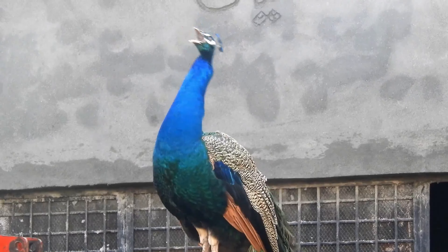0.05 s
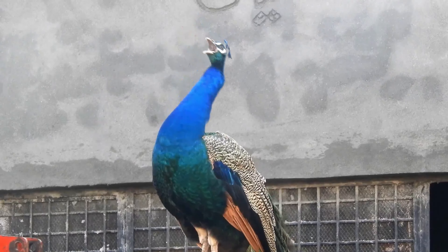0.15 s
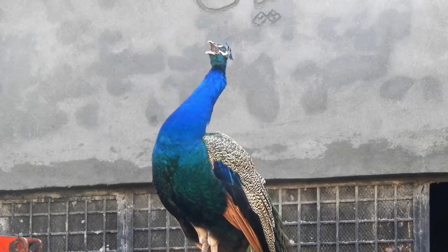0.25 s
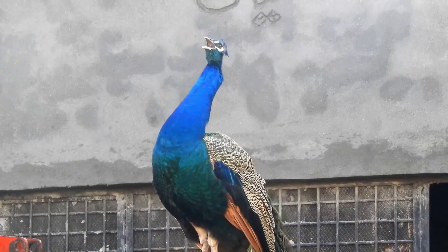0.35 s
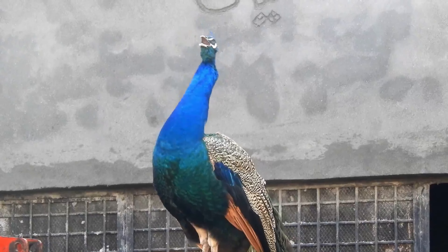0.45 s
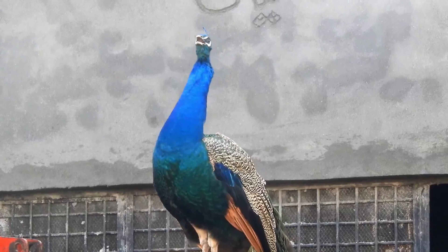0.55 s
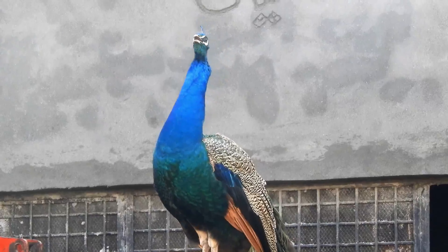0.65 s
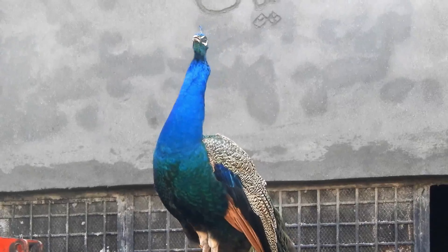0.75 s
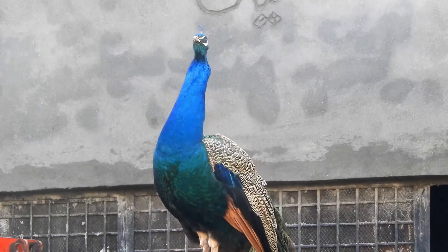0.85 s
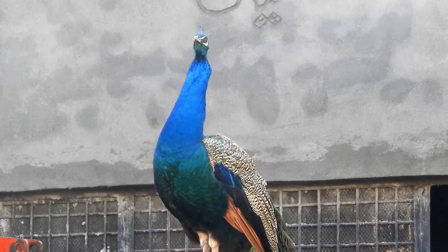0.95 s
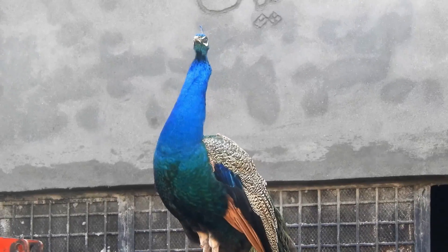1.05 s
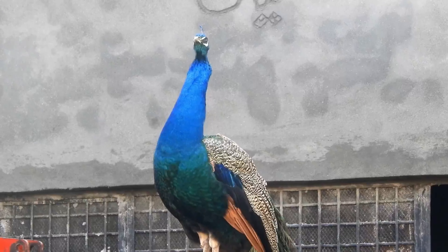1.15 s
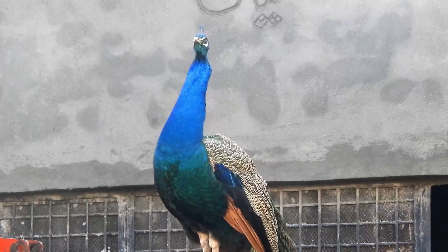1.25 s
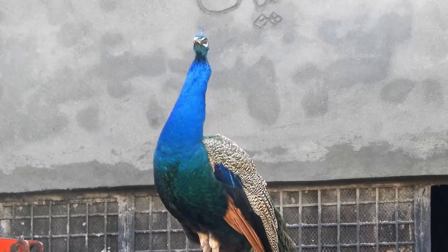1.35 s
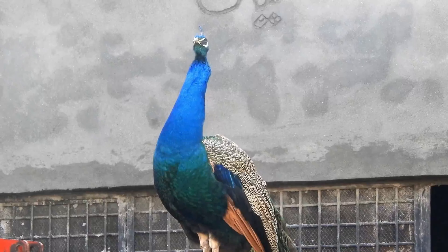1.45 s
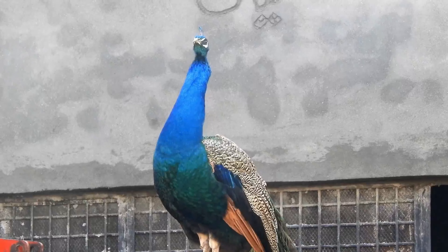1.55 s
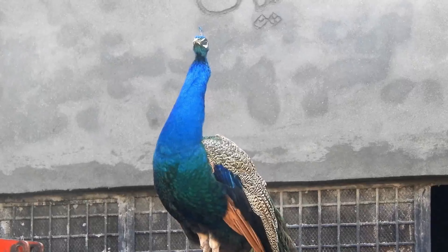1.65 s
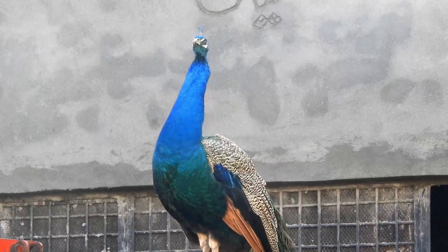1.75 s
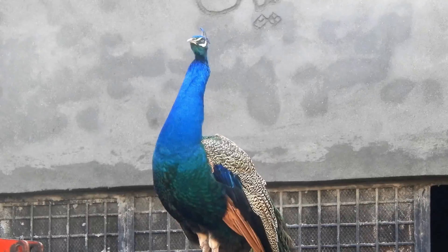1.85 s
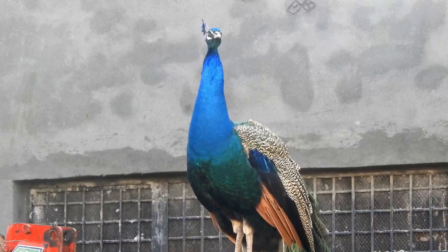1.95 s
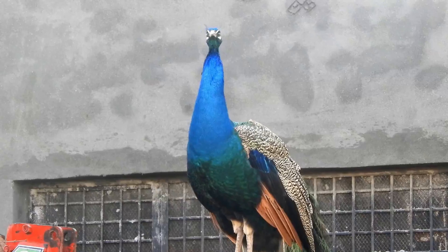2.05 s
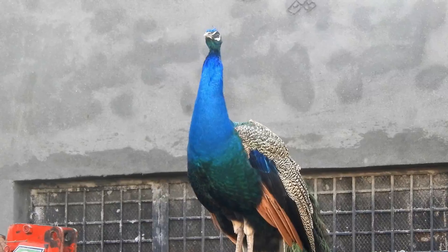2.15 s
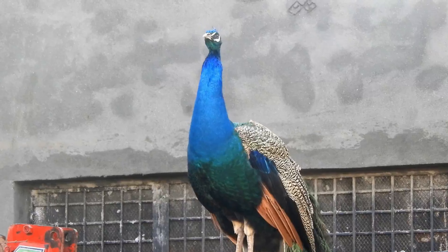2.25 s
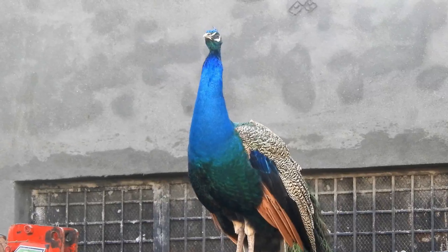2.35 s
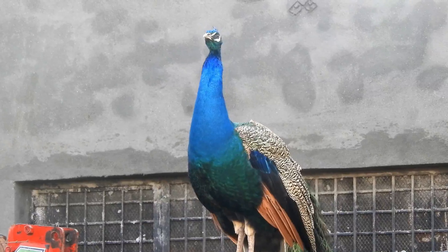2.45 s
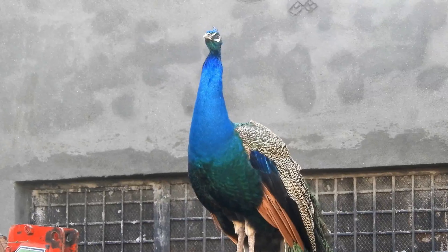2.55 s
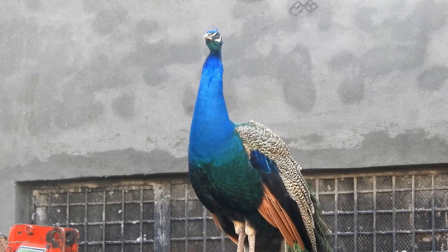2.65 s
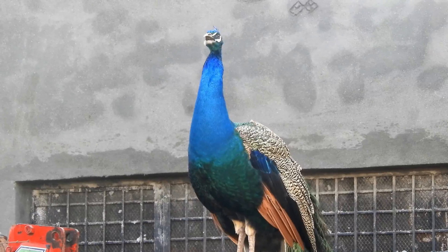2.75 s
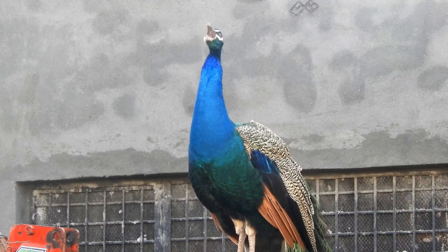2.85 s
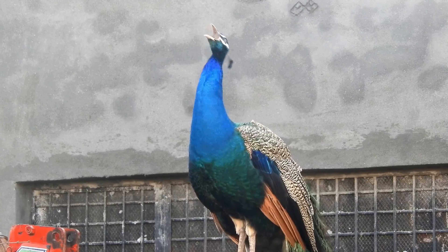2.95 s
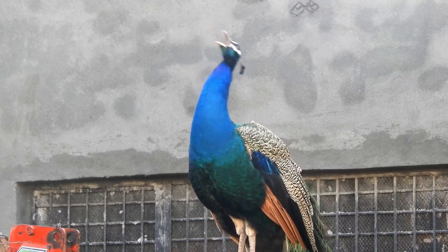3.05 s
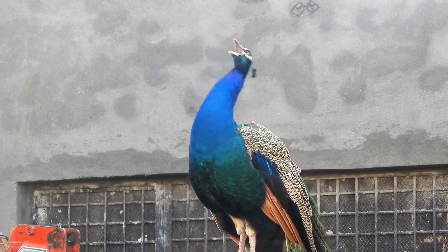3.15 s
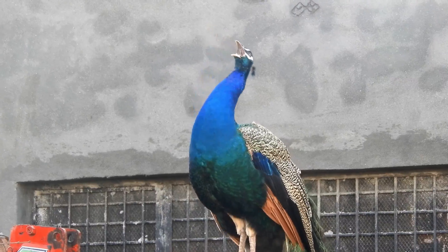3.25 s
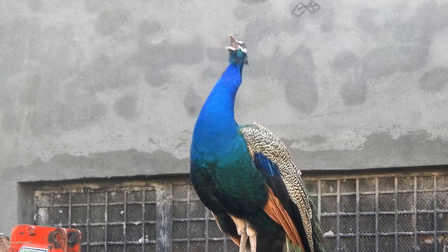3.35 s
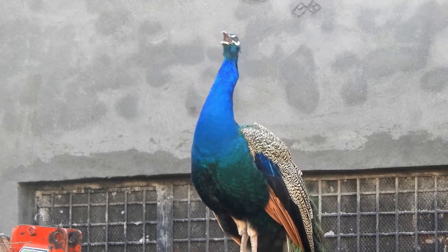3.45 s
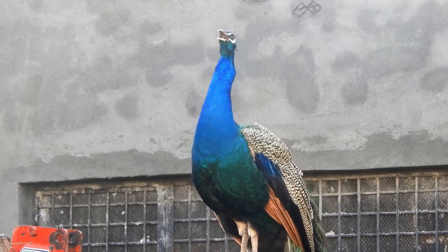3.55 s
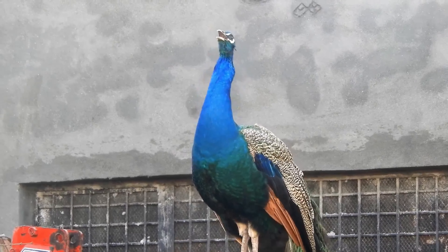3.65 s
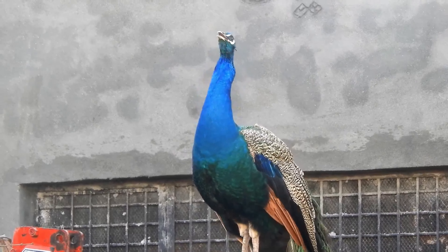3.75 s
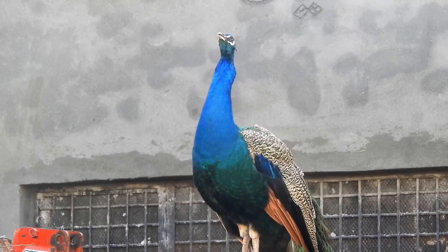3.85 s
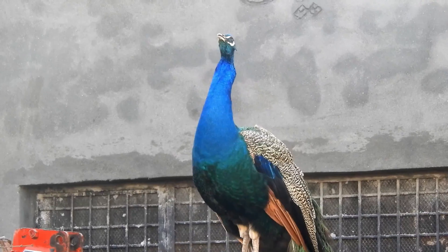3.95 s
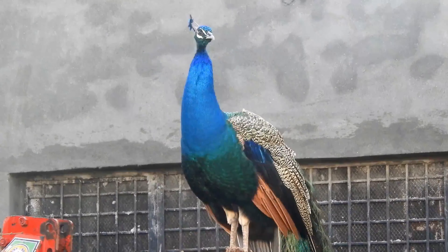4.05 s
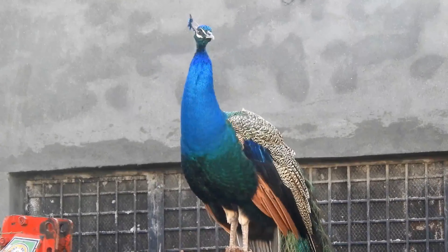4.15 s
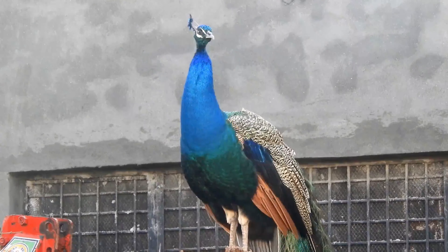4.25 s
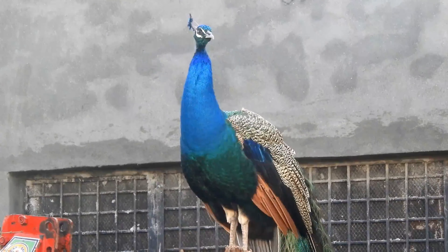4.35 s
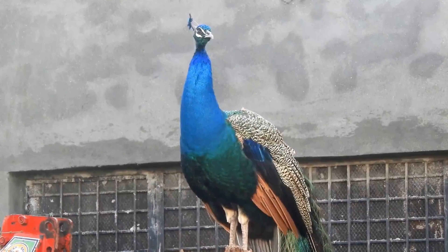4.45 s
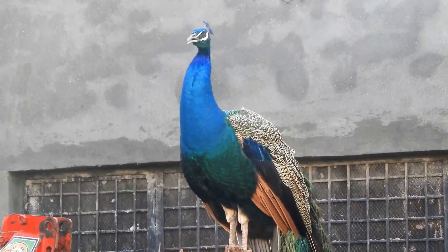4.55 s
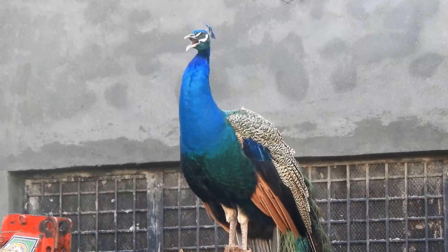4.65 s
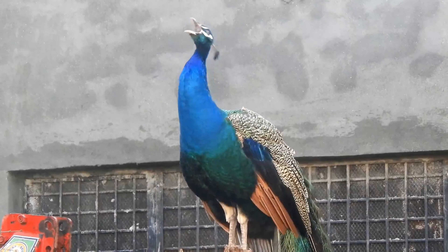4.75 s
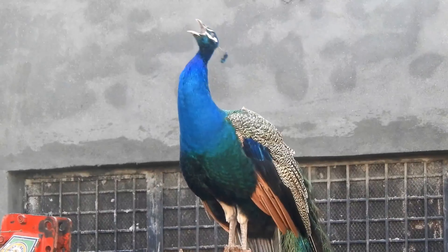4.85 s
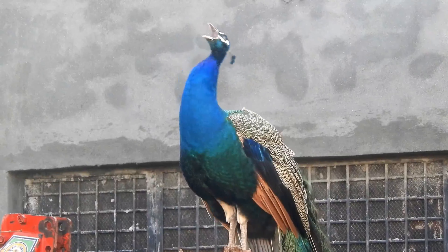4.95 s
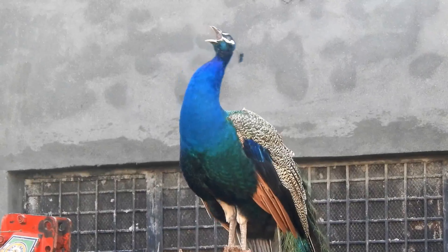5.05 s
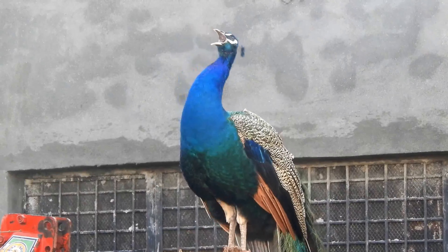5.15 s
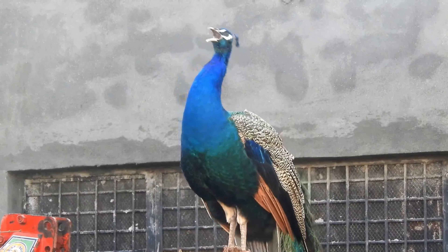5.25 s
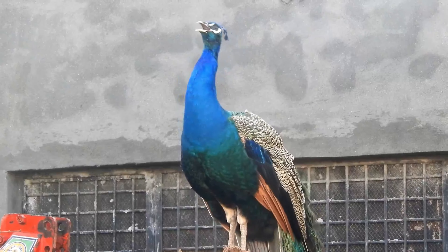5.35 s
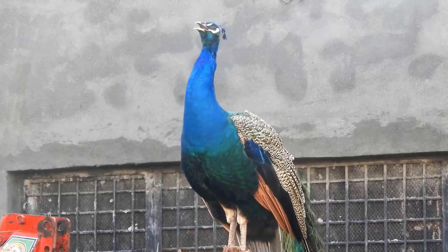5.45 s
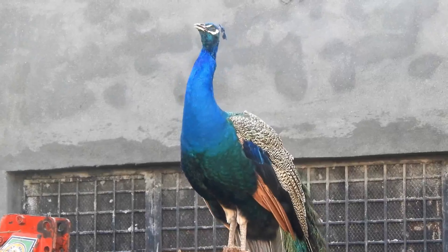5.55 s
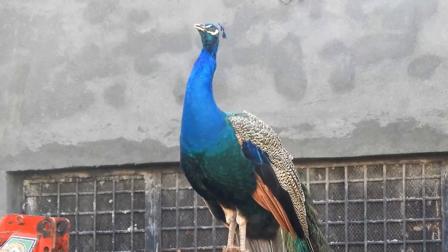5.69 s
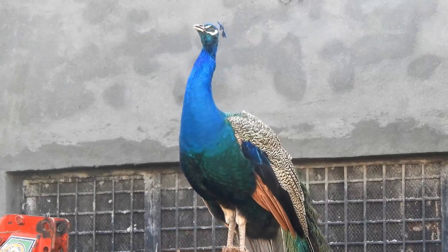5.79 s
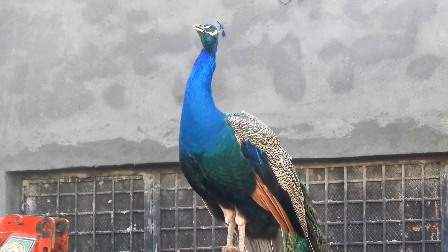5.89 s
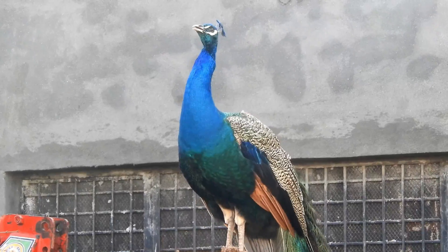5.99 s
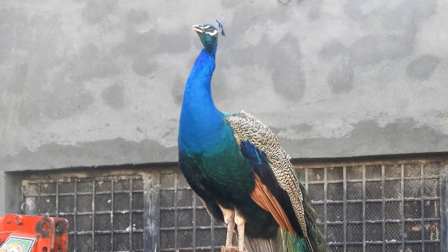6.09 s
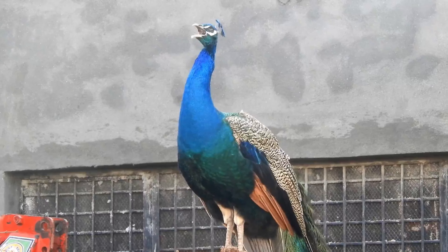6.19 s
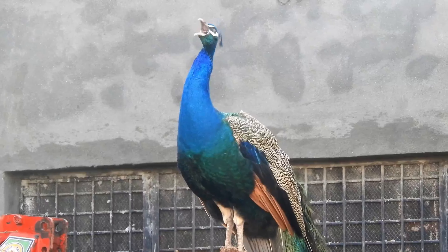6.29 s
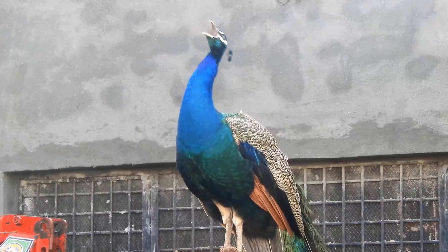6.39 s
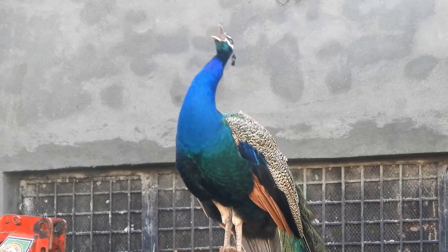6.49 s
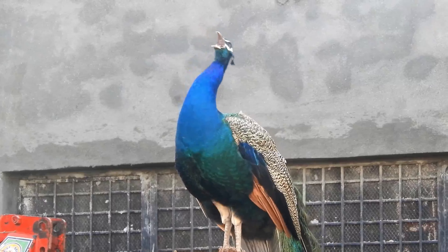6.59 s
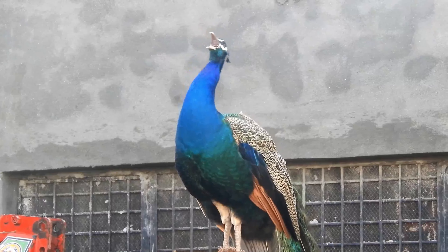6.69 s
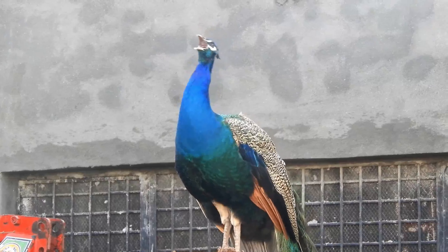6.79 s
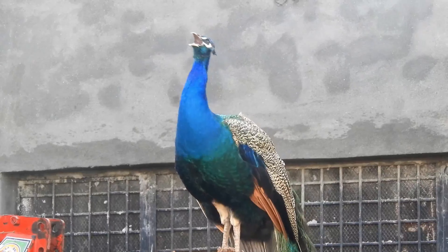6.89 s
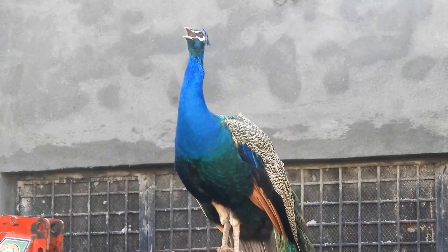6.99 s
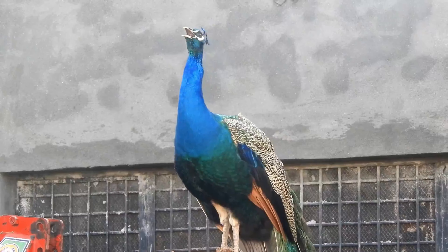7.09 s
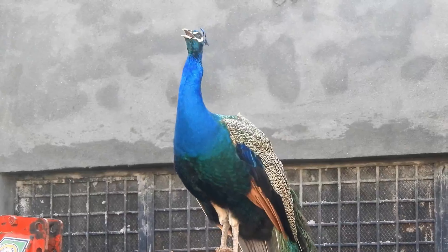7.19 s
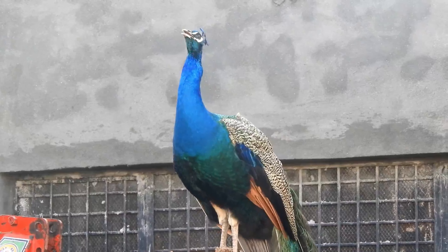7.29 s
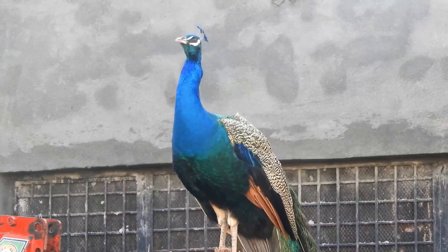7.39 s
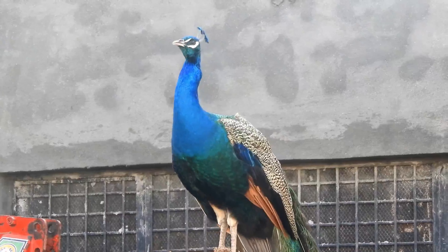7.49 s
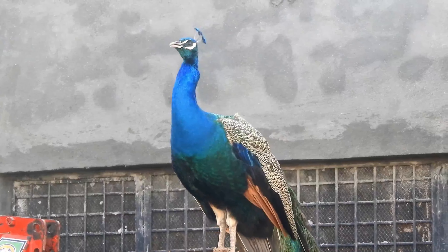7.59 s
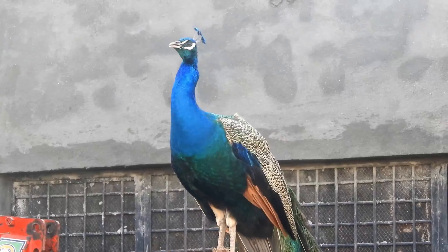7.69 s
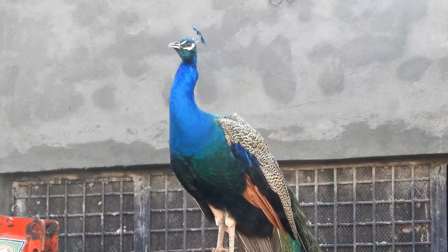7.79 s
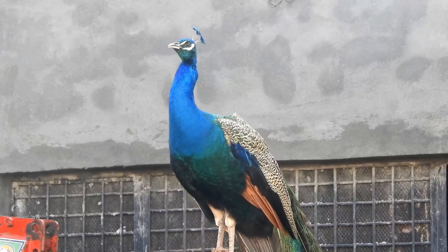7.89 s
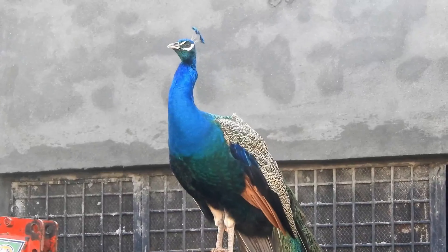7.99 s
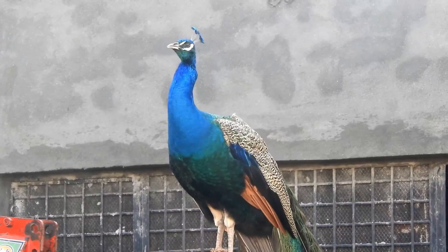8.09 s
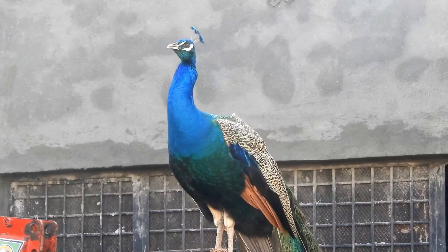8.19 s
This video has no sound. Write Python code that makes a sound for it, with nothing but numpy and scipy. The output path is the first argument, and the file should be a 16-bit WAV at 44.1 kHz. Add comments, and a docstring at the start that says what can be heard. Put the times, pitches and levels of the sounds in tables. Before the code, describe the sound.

A light breeze runs throughout as low rumble, midrange wash and thin leafy hiss, rising and falling gently. At 0 s a nearby peacock gives a coarse, low, nearly level honk of about a third of a second, with a soft thump beside it. From 0.4 to 2.8 s small birds farther off drop short falling whistles, pips and hoarse chatter; faint low bumps touch the microphone around 1.2 and 2.1 to 2.4 s. At 2.9 s comes a loud, brassy cry of about 0.65 s, gliding up, turning purer, then falling. A quick trill and brighter chirps follow around 3.6 to 4.4 s. A second, stronger cry sounds at 4.8 s, and a third at 6.3 s climbs highest before dropping. Nearby walls return short echoes, and the background dips after the loudest peaks. A faint bump at 7.5 s, a dull distant knock at 7.8 s and final pips around 8 s close.

```python
"""A breeze rumbles, washes and hisses throughout (wavering filtered noise); whistles and chatter (bent tones) are scattered over it.
A peacock honks low at the start beside a soft bump (decaying low noise); most other bumps fall before its second call.
Three arching cries follow, near 2.9, 4.8 and 6.3 s: harmonics in four registers plus turbulence, echoed by walls (noise tails).
Something knocks at 7.8 s (decaying noise). Gain control cuts the loudest peaks and recovers slowly, so the background dips."""
import sys
import numpy as np
from scipy import signal
from scipy.fft import rfft, irfft, next_fast_len
from scipy.io import wavfile
from scipy.ndimage import uniform_filter1d, minimum_filter1d, map_coordinates

SR = 44100
rng = np.random.default_rng(int(sys.argv[2]) if len(sys.argv) > 2 else 0)


def wav_out(sig):
    """Save sig, one row per channel (or a flat mono array), as 16-bit PCM at SR to the path in sys.argv[1]."""
    wavfile.write(sys.argv[1], SR, np.round(np.clip(np.atleast_2d(sig).T, -1, 1) * 32767).astype(np.int16))


N = 362943

# breeze: (time [s], rumble [dB], yard wash before trim [dB], leaf hiss before trim [dB])
BREEZE = [(.5, -47.5, -54.5, -54), (1.15, -45, -56, -52.5), (1.9, -48.5, -56.5, -57.5),
          (2.25, -47, -48.5, -51.5), (2.85, -47, -48.5, -53.5), (3.699, -50.5, -58.5, -56.5),
          (4.3, -42.5, -52.5, -54), (5.5, -52, -60, -59.5), (6.9, -44.5, -56.5, -56),
          (7.701, -52.5, -63.5, -66), (8.23, -44, -61, -62.5)]
# noise spectra of the rumble, yard wash and leaf hiss: (frequency [Hz], relative level [dB])
RUMBLE_SPECTRUM = [(20, 2.5), (35, -5.5), (70, -2), (150, 0), (210, -5), (300, -25.5), (450, -37.5),
                   (800, -93)]
YARD_SPECTRUM = [(120, -17), (280, 1), (500, -3), (1100, -5), (1800, -9), (3000, -13), (6000, -40.5)]
HISS_SPECTRUM = [(900, -24), (2000, -3), (3000, -5.5), (4500, 0.5), (6500, -6), (8500, -10), (10000, -19),
                 (14000, -22.5), (16000, -32)]
# noise spectrum of the knock: (frequency [Hz], relative level [dB])
KNOCK_SPECTRUM = [(60, -29), (110, 6), (350, 2.5), (550, -14), (900, -12), (1700, -18), (4500, -24.5),
                  (8700, -35), (12000, -56)]
# soft bumps: (time [s], level [dB], centre [Hz], t60 [s])
BUMPS = [(0.066, -16, 115, 0.071), (1.172, -35.5, 32.3, 0.41), (2.07, -35, 130, 0.11),
         (2.307, -24, 105, 0.2), (2.342, -33, 125, 0.16), (2.394, -24, 142.5, 0.12),
         (7.506, -35.5, 109.7, 0.2)]

# Small-bird notes, all: (time [s], length [s], mid-note pitch [Hz], sweep [Hz], level before trim [dB])
# drop and level out
DOWNSLURS = [(.40, 0.053, 2737, -1000, -38.5), (.72, 0.07, 2585, -590, -46.5),
             (.93, 0.042, 2710, -470, -38.5), (1.055, 0.057, 2774, -430, -41),
             (1.21, 0.078, 2800, -460, -45.5), (2.054, 0.062, 2876, -220, -41),
             (2.70, 0.084, 1850, -450, -46.5), (3.53, .12, 2394, -200, -36), (3.63, 0.33, 3870, -670, -47),
             (3.904, .12, 2520, -1000, -31.5), (3.915, 0.056, 3220, -830, -33),
             (4.23, 0.11, 2082, -400, -44.5), (4.405, .035, 3050, -1000, -35.5)]
# climb steadily
UPSLURS = [(.52, .11, 2990, 1300, -43), (1.40, 0.078, 2394, 860, -44.5), (1.79, 0.14, 2690, 1001, -44),
           (2.71, .12, 3980, 1056, -47.5), (5.68, .035, 4570, 700, -50.5), (5.84, 0.048, 4150, 905, -46),
           (7.94, 0.064, 2562, 650, -49.5)]
# short, mostly lifting onto a held pitch
PIPS = [(1.495, .035, 2996, 303, -38), (1.552, .042, 3177, 100, -39), (1.62, .055, 3157, 30, -41.5),
        (2.42, 0.11, 2450, 71, -46.5), (4.104, 0.066, 3090, 168, -34), (4.44, 0.076, 2753, 0.5, -46),
        (8.007, .038, 3000, 208, -42.5), (8.069, .038, 3220, -1, -43.5), (8.122, 0.045, 3212, 2, -40.5)]
# thin, high, falling ever faster
SWOOPS = [(5.44, .20, 5370, -1350, -46.5), (5.71, 0.072, 4710, -900, -43.5),
          (6.188, .1, 5900, -2250, -47.5)]
# hoarse
CHATTER = [(1.19, 0.16, 5280, -950, -50), (1.50, 0.11, 4700, -1000, -55), (1.95, 0.095, 3110, -6.5, -48.5),
           (2.24, .13, 6160, 2.5, -55), (2.46, 0.14, 3200, 2.5, -48), (3.90, 0.084, 6140, -600, -53),
           (4.23, 0.16, 4660, -500, -56), (5.90, 0.055, 4800, -1700, -55), (7.66, .13, 5600, -1100, -58)]
# low, nearly level, far off
HOOTS = [(1.40, 0.71, 1600, -130, -55), (1.44, 0.45, 779, -8, -56), (1.90, .07, 351, 13.5, -42.5),
         (4.47, .27, 1707, -72.5, -46), (6.05, 0.1, 2193, -20, -55)]
# quick run of like notes: (time [s], level of the held part [dB])
TRILL = [(3.601, -43.5), (3.675, -45), (3.748, -46.5), (3.823, -45), (3.901, -43.5), (3.975, -42)]

# arch of each call, start to end: (time [s], pitch [Hz], push over held effort [dB], flare of the twelfth [dB])
ARCHES = [
    [(0, 522, 4.5, 4), (.064, 529.3, -1, -1.5), (.125, 546.2, -2.5, 2.5), (.2, 535.8, -4, 0),
     (.306, 529.3, -6, 2), (.341, 507, -3.5, 4.5)],
    [(2.877, 540.4, 2, 2.5), (2.9, 538.6, -4, -4.5), (2.98, 583.8, 2.5, 1), (3.05, 616.3, 1, -5),
     (3.15, 635.8, -1.5, 6), (3.25, 640.5, -2.5, 1), (3.28, 644.8, 2, 7.5), (3.385, 654.4, 1.5, -2),
     (3.44, 626.4, -1.5, 4), (3.525, 548, 6.5, -1)],
    [(4.768, 554, -8, 1), (4.797, 583.8, 3, 5.5), (4.845, 600.6, -3.5, -5), (4.88, 628.6, 2.5, 4),
     (5.0, 658, 0, -2), (5.11, 672.3, -3, 3), (5.215, 680.5, 2, 2), (5.3, 670.4, -3, -2), (5.34, 607, 3, 8)],
    [(6.295, 542.7, -1.5, 0), (6.365, 592, -3, 0.5), (6.415, 630.5, 4, 4.5), (6.47, 641.3, 1, -1.5),
     (6.55, 658.8, 2, 0.5), (6.655, 662.5, 1.5, 1), (6.825, 740.4, -0.5, -4.5), (6.895, 733, -4, 0),
     (6.955, 663.3, -1, -5.5), (7.016, 565.6, 0, 3.5)],
]
# effort of each call: (level [dB], brightness [dB], swell [s], release [s], beak narrows at [s],
# how far [0-1], rasp [dB], fundamental before trim [dB])
CRIES = [(-7.5, 2, 0.011, 0.026, 0.84, .1, -23, -2.5), (-6.5, 0, 0.032, 0.1, 3.293, .75, -25.5, 1),
         (-2, 1, 0.03, 0.032, 5.127, .9, -25.5, 0), (-5, 0, .085, 0.074, 6.71, 1, -26, -1.5)]
# octave, twelfth, blare (partials 4-5), edge (6 and up): (beak wide [dB], beak narrow [dB],
# lead on the beak [s], change time [s], lack at onset [dB], fall in release [dB])
REGISTERS = [(1.5, 7.5, 0.016, 0.014, 13, 26.5), (1.5, -14, -0.00043, 0.01, 17, 16),
             (1, -20.5, 0.0076, 0.059, 21, 21), (-10, -15.5, -0.11, 0.017, 17, 17.5)]
# throat colour in the low honk, beak wide, beak narrowing: (frequency [Hz], relative level [dB])
HONK_COLOUR = [(520, -21.5), (1050, -2), (2150, 0.5), (2700, -4.5), (3200, -19.5), (3750, -20),
               (4300, -12.5), (4800, -20.5), (5400, -29), (8300, -36.5), (9500, -61), (15000, -89.5)]
WIDE_COLOUR = [(600, -20), (1200, 2), (2400, -6), (3200, -12), (3650, -14), (4400, -8.5), (5100, -21),
               (7300, -24.5), (8500, -32), (9500, -43), (15000, -62)]
NARROW_COLOUR = [(680, -22.5), (1350, -8), (2700, -16), (3450, -17), (4100, -13), (4700, -11), (5300, -25),
                 (5950, -12.5), (7500, -29.5), (9500, -33), (11900, -40), (15000, -75)]
# turbulence low in the throat, and sizzle at the beak: (frequency [Hz], relative level [dB])
RASP_SPECTRUM = [(150, -26.5), (400, -17.5), (800, -7), (1300, -7), (2200, -6), (3300, -17), (4500, -16.5),
                 (7500, -27), (9800, -50), (15000, -63)]
SIZZLE_SPECTRUM = [(1500, -22), (3500, -5), (4600, -7), (7500, -7.5), (8700, -6), (9800, -20.5),
                   (15500, -32)]

# decay of the late tail: (frequency [Hz], t60 [s])
LATE_T60 = [(200, 0.55), (700, 0.74), (1430, 0.58), (2200, 0.79), (5000, 0.29), (9000, .45), (15000, .2)]
# treble lift of the reflections: (frequency [Hz], gain [dB])
TREBLE_LIFT = [(1400, 3), (2400, 4.5), (4500, 8), (9000, 10.5)]

STRAIN_S = .1  # a cry's added roughness peaks this long after its start
GAIN_KNEE_DB, GAIN_SHARE, RECOVERY_DB_PER_S = -2.5, 0.72, 7  # share: part of the excess taken off
TOP_HZ = 15800
PEAK_HOLD = SR // 100  # samples


def amp(db):
    """Decibels to gain."""
    return 10 ** (np.asarray(db) / 20)


def unit(x):
    """x at rms 1."""
    return x / np.sqrt(np.mean(x ** 2) + 1e-20)


def along(points, hz):
    """(Hz, value) points read on a log frequency axis."""
    f, v = np.transpose(points)
    return np.interp(np.log(hz + 1), np.log(f + 1), v)


def wobble(knots_per_s, size):
    """Smooth random curve."""
    knots = rng.standard_normal(int(size * knots_per_s / SR) + 4)
    return map_coordinates(knots, [np.arange(size) * knots_per_s / SR])


def filtered(x, response):
    """x times a response of frequency."""
    size = x.shape[-1]
    m = next_fast_len(size + 8192)
    return irfft(rfft(x, m) * response(np.fft.rfftfreq(m, 1 / SR)), m)[..., :size]


def noise(spectrum, size):
    """Coloured noise of rms 1."""
    white = rng.standard_normal(size)
    return unit(filtered(white, lambda hz: amp(along(spectrum, hz))))


def add(track, time_s, sound):
    """Lay a sound into a track."""
    start = max(0, round(time_s * SR))
    track[start:start + len(sound)] += sound[:max(0, N - start)]


def fade(t, edge_s):
    """Gate over the times t with smooth edges."""
    from_end_s = np.minimum(t - t[0], t[-1] - t)
    return np.sin(np.pi / 2 * np.clip(from_end_s / edge_s, 0, 1)) ** 2


def spread(spectrum, side_db, waver_db):
    """Wavering stereo noise, mostly common to both ears."""
    mid = noise(spectrum, N)
    side = amp(side_db) * noise(spectrum, N)
    return np.array([mid + side, mid - side]) * amp(waver_db * wobble(31, N))


def air():
    """Low rumble, midrange yard wash and leaf hiss: noise bands following the breeze."""
    time_s, *columns_db = np.transpose(BREEZE)
    rumble, yard, hiss = [amp(np.interp(np.arange(N) / SR, time_s, db)) for db in columns_db]
    return (rumble * spread(RUMBLE_SPECTRUM, side_db=-15.0, waver_db=2.4)
            + yard * amp(1.5) * spread(YARD_SPECTRUM, side_db=-8, waver_db=1.77)
            + hiss * amp(2.0) * spread(HISS_SPECTRUM, side_db=-6, waver_db=1.2))


def struck(t, level_db, t60_s, rise_s, spectrum):
    """Noise that rises fast and decays exponentially."""
    envelope = amp(level_db - 60 * t / t60_s) * (1 - np.exp(-t / rise_s))
    return envelope * noise(spectrum, len(t))


def bumps():
    """Soft pushes on the microphone: decaying noise around a low centre."""
    track, t = np.zeros(N), np.arange(SR // 2) / SR
    for time_s, level_db, centre_hz, t60_s in BUMPS:
        spectrum = [(centre_hz / 4, -14), (centre_hz, 0), (centre_hz * 1.3, -3),
                    (centre_hz * 3, -30), (centre_hz * 12, -80)]
        add(track, time_s, struck(t, level_db, t60_s, 0.0017, spectrum))
    return track


def knock(level_db=-35, t60_s=0.9):
    """Blunt knock some way off: broader decaying noise."""
    track, t = np.zeros(N), np.arange(SR // 2) / SR
    add(track, 7.789, struck(t, level_db, t60_s, 0.0016, KNOCK_SPECTRUM))
    return track


def whistle(length_s, start_hz, middle_hz, end_hz, hoarse_hz):
    """Tone of rms 1 bent through three pitches; fast pitch scatter makes it hoarse."""
    t = np.arange(round(length_s * SR)) / SR
    bend = np.polyfit([0, .5, 1], [start_hz, middle_hz, end_hz], 2)
    pitch_hz = np.polyval(bend, t / length_s)
    pitch_hz = pitch_hz + hoarse_hz * wobble(2 * abs(hoarse_hz) + 100, len(t))
    swell = fade(t, 0.047 * length_s) * amp(3.7 * wobble(69, len(t)) - 5.2 * (t / length_s) ** 3)
    return unit(np.sin(2 * np.pi * np.cumsum(pitch_hz) / SR) * swell)


def notes(rows, bend, hoarse):
    """Notes of one kind: bend is the sweep share done by mid-note, hoarse the scatter per pitch."""
    track = np.zeros(N)
    for time_s, length_s, hz, sweep_hz, level_db in rows:
        start_hz, end_hz = hz - bend * sweep_hz, hz + (1 - bend) * sweep_hz
        add(track, time_s, amp(level_db - 2) * whistle(length_s, start_hz, hz, end_hz, hoarse * hz))
    return track


def songbirds():
    """Six kinds of bent tones, and a run of notes that each drop steeply onto a held pitch."""
    track = (notes(DOWNSLURS, bend=.76, hoarse=0.017) + notes(UPSLURS, bend=0.51, hoarse=.011)
             + notes(PIPS, bend=0.75, hoarse=.005) + notes(SWOOPS, bend=0.13, hoarse=0.0065)
             + notes(CHATTER, bend=0.62, hoarse=0.12) + notes(HOOTS, bend=0.5, hoarse=0.052))
    for time_s, level_db in TRILL:
        add(track, time_s - .012, amp(level_db - 9) * whistle(.022, 7000, 6000, 5400, 120))
        add(track, time_s, amp(level_db) * whistle(0.029, 4950, 5200, 5200, 50))
    return track


def cry(arch, effort_row, throat, jitter=.0017, flutter_db=3.0, shimmer_db=0.51, sizzle_db=-22, break_up=4):
    """One call: syrinx harmonics, blaring at first and purer as the beak narrows, plus turbulence."""
    time_s, arch_hz, push_db, flare_db = np.transpose(arch)
    call_db, bright_db, swell_s, release_s, narrows_at_s, how_far, rasp_db, root_db = effort_row
    t = np.arange(time_s[0] - .03, time_s[-1] + .004, 1 / SR)
    size = len(t)
    age_s, to_end_s = np.maximum(t - time_s[0], 0), t - time_s[-1]
    pitch_hz = np.interp(t, time_s, arch_hz)

    def beak(lead_s, change_s):
        """Narrowing of the beak, 0 to how_far."""
        return how_far * (1 + np.tanh((t - narrows_at_s + lead_s) / change_s / 2)) / 2

    # exponential growth out of silence, then swell, hold and release
    growth_db = 3200 * np.minimum(t - time_s[0] - .002, 0)
    hold_db = call_db + np.interp(t, time_s, push_db) + growth_db
    onset = np.exp(-age_s / swell_s)
    release = np.maximum(1 + to_end_s / release_s, 0)
    register_db = []
    for wide_db, narrow_db, lead_s, change_s, lack_db, fall_db in REGISTERS:
        beak_db = wide_db + (narrow_db - wide_db) * beak(lead_s, change_s)
        register_db.append(hold_db + beak_db - lack_db * onset - fall_db * release)
    octave_db, twelfth_db, blare_db, edge_db = register_db
    twelfth_db = twelfth_db + np.interp(t, time_s, flare_db)
    # upper registers speak a moment after the tone
    late_db = 35 * np.exp(-age_s / .006)
    blare_db = blare_db + bright_db - late_db
    edge_db = edge_db + bright_db - late_db

    # pitch unsteady as the call breaks into its blare, and again as pressure gives out
    strain = 1.2 * (age_s / STRAIN_S) ** 2 * np.exp(2 - 2 * age_s / STRAIN_S) * how_far
    unsteady = jitter * (1 + strain + break_up * np.exp(to_end_s / 0.061))
    phase = 2 * np.pi * np.cumsum(pitch_hz * (1 + unsteady * wobble(300, size))) / SR

    order = np.arange(1, 25)[:, None]
    narrow = beak(lead_s=0.017, change_s=0.0081)
    wide_colour_db = along(throat, order * pitch_hz)
    narrow_colour_db = along(NARROW_COLOUR, order * pitch_hz)
    colour_db = (1 - narrow) * wide_colour_db + narrow * narrow_colour_db
    # weak pressure at either end dulls the high partials
    slack = np.exp(-age_s / 0.076) + np.exp(to_end_s / 0.077)
    colour_db = colour_db - 16 * slack * np.log2(np.maximum(order / 12, 1))
    flutter = np.array([wobble(35, size) for _ in order])
    gains = amp(colour_db + flutter_db * flutter)
    partials = gains * np.sin(order * phase + rng.uniform(0, 2 * np.pi, order.shape))

    # each register scaled to its own level
    voice = np.zeros(size)
    for member, db in [(order == 2, octave_db), (order == 3, twelfth_db),
                       ((order > 3) & (order < 6), blare_db), (order > 5, edge_db)]:
        register_rms = np.sqrt((gains ** 2 * member).sum(0) / 2)
        voice += amp(db) * (partials * member).sum(0) / register_rms

    # fundamental and rasp follow the whole effort, sizzle follows the edge
    effort = np.sqrt(0.29 * amp(octave_db) ** 2 + amp(twelfth_db) ** 2
                     + amp(blare_db) ** 2 + 3 * amp(edge_db) ** 2)
    root = effort * amp(root_db + 1.5 - 10 * narrow * (0.5 - release)) * partials[0]
    rasp = effort * amp(rasp_db) * noise(RASP_SPECTRUM, size)
    sizzle = amp(edge_db + sizzle_db) * noise(SIZZLE_SPECTRUM, size)
    puffs = amp(3.3 * wobble(40, size)) * (1 + 0.8 * np.cos(phase))  # one puff a cycle
    build_up = 1 - np.exp(-age_s / 0.0084)
    turbulence = (rasp + sizzle) * puffs * build_up
    shimmer = amp(shimmer_db * wobble(400, size))
    sound = (voice + root + turbulence) * shimmer * fade(t, .008)
    return np.interp(np.arange(N), round(t[0] * SR) + np.arange(size), sound, left=0, right=0)


def peacock():
    """Low, nearly level honk, then three arching cries, each through its throat colour."""
    throats = [HONK_COLOUR, WIDE_COLOUR, WIDE_COLOUR, WIDE_COLOUR]
    return sum(cry(arch, row, throat) for arch, row, throat in zip(ARCHES, CRIES, throats))


def walls(x, early_db, late_db, early_t60_s=.17, side_db=-18, far_db=-14, far_t60_s=2.0):
    """Quick reflections make gliding partials flare and drop out; a late and a duller far tail follow."""
    hz, t, grains = signal.stft(rng.standard_normal((2, 3 * SR // 2)), SR, nperseg=256)

    def tail(t60_s):
        """Decaying noise pair of unit energy in its first channel."""
        decaying = signal.istft(grains * amp(-60 * t / t60_s) * (t > .004), SR, nperseg=256)[1]
        return decaying / np.linalg.norm(decaying[0])

    early = filtered(tail(early_t60_s), lambda f: amp(early_db + along(TREBLE_LIFT, f)))
    late = filtered(tail(along(LATE_T60, hz)[:, None]),
                    lambda f: amp(late_db + 0.32 * along(TREBLE_LIFT, f)))
    far = filtered(tail(far_t60_s), lambda f: amp(late_db + far_db) / (1 + (f / 2600) ** 4))
    mid, side = signal.fftconvolve(x[None], early + late + far, axes=1)[:, :N]
    return x + mid + amp(side_db) * np.array([side, -side])


def gain_control(x):
    """Peaks over the knee pull the gain down at once; it creeps back, so the background dips."""
    peaks = uniform_filter1d(-minimum_filter1d(-np.abs(x).max(0), PEAK_HOLD), PEAK_HOLD)
    excess_db = np.maximum(20 * np.log10(np.abs(peaks) + 1e-9) - GAIN_KNEE_DB, 0)
    recovered_db = RECOVERY_DB_PER_S * np.arange(N) / SR
    # running maximum on a rising ramp = instant attack, linear dB recovery
    cut_db = np.maximum.accumulate(GAIN_SHARE * excess_db + recovered_db) - recovered_db
    return x * amp(-cut_db)


def scene():
    """Near, fairly dry peacock; farther, wider small birds and knock; dry bumps and air."""
    return (air() + bumps()
            + walls(knock(), early_db=-9.5, late_db=-17.5, side_db=-6)
            + walls(songbirds(), early_db=-15.5, late_db=-15.5, side_db=-15.5)
            + walls(peacock(), early_db=-12.0, late_db=-27.5, side_db=-22.5))


def record(dry, ceiling=1.05):
    """Gain control, a fast limiter, clipping of remaining peaks at full scale, then a band limit."""
    held = gain_control(dry)
    needed = ceiling / np.maximum(np.abs(held).max(0), ceiling)
    gain = uniform_filter1d(minimum_filter1d(needed, PEAK_HOLD), PEAK_HOLD)
    return filtered(np.clip(held * gain, -1, 1), lambda hz: hz < TOP_HZ)


dry = scene()
out = record(dry)
wav_out(out)
```